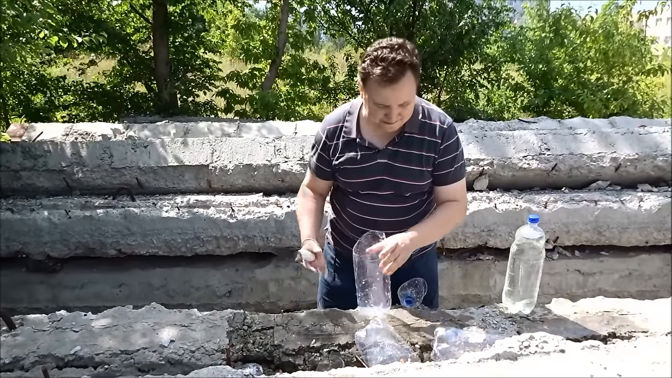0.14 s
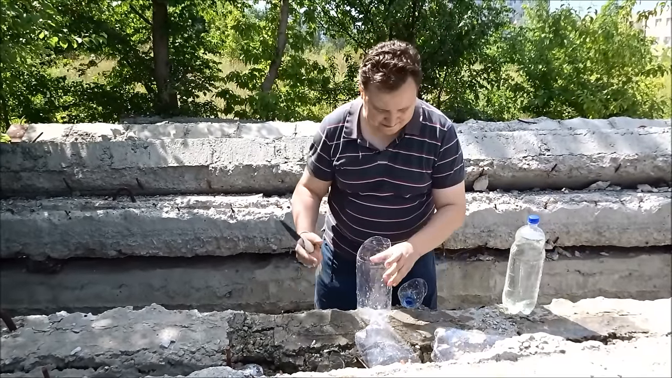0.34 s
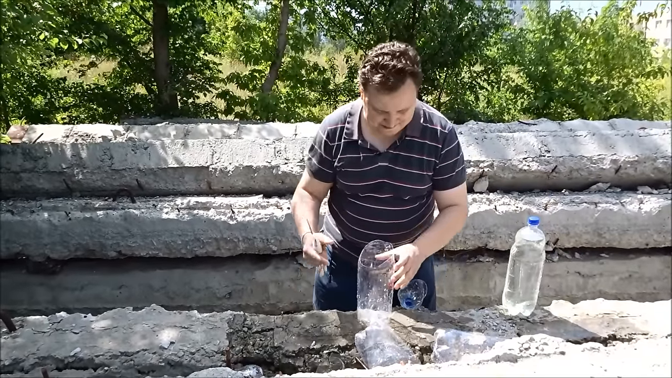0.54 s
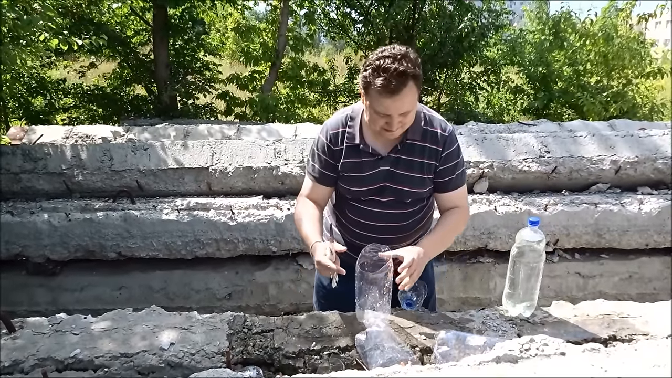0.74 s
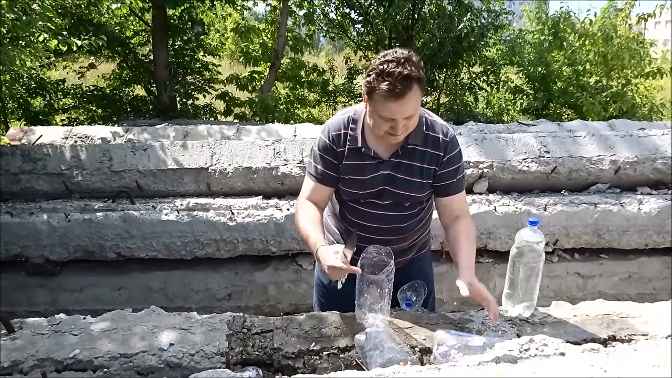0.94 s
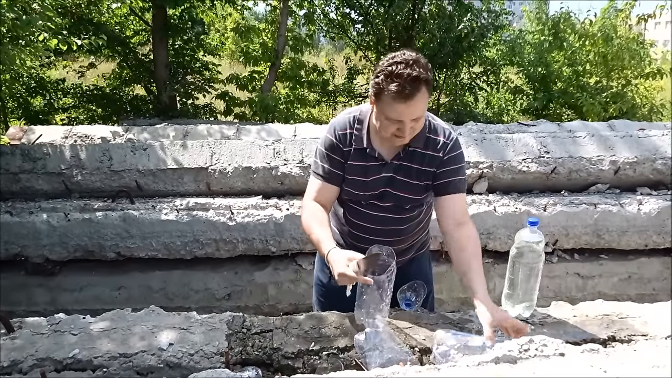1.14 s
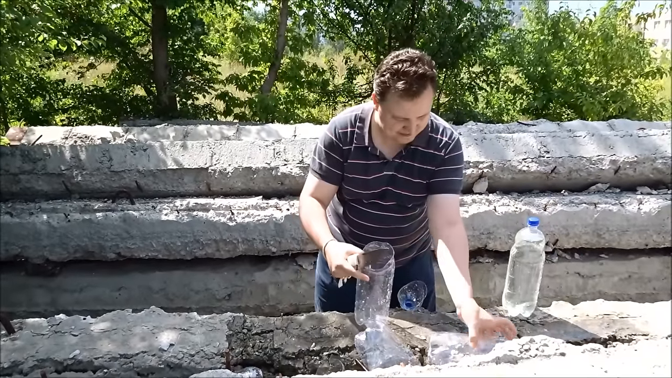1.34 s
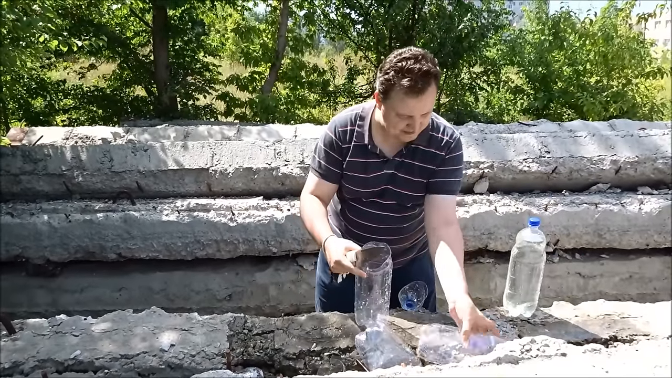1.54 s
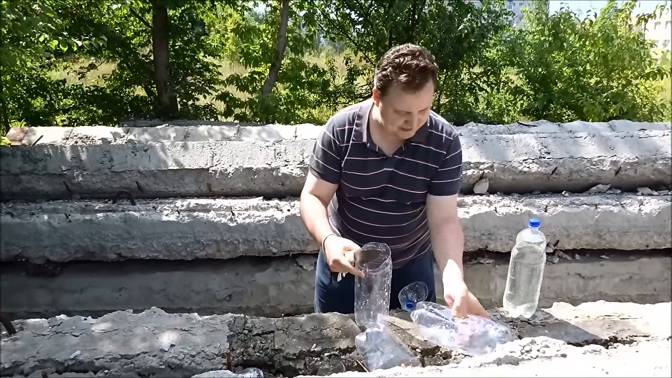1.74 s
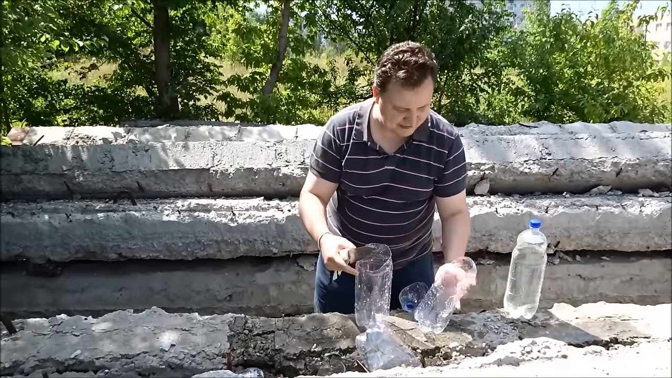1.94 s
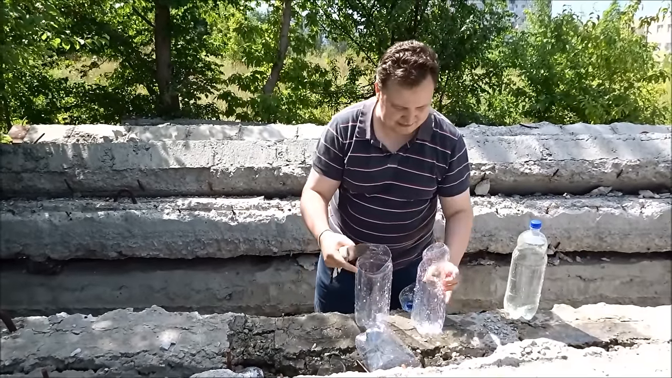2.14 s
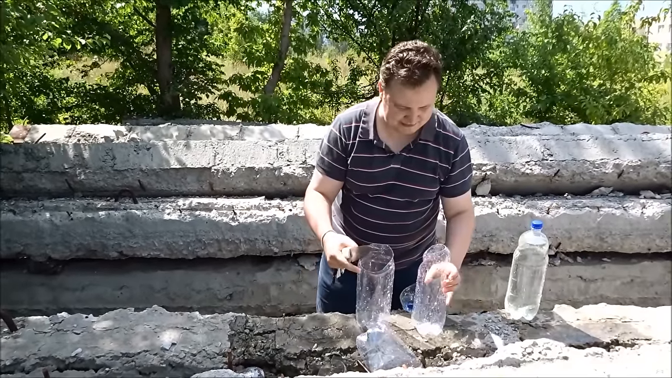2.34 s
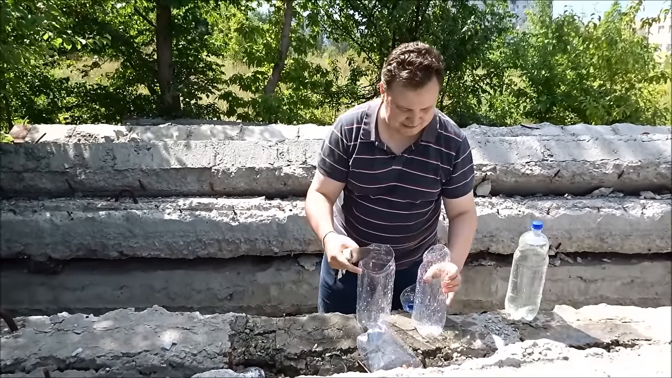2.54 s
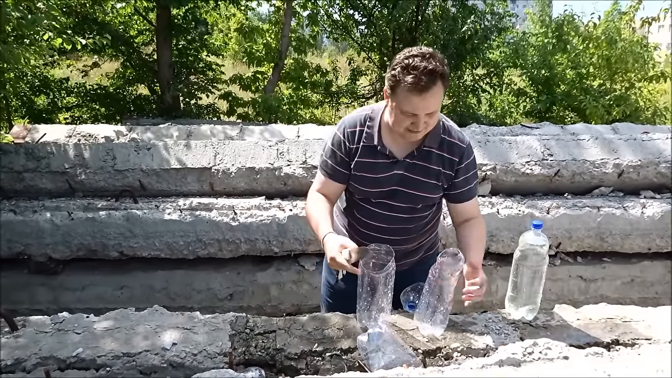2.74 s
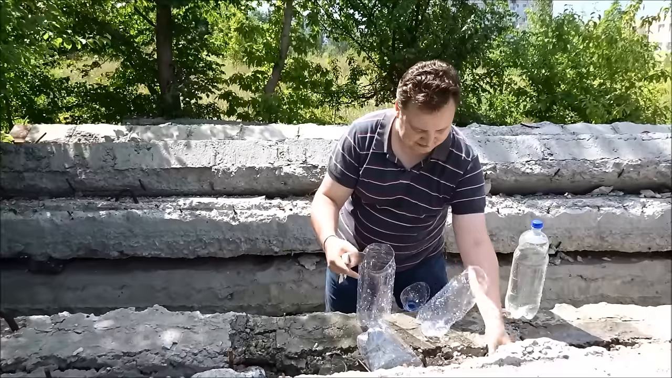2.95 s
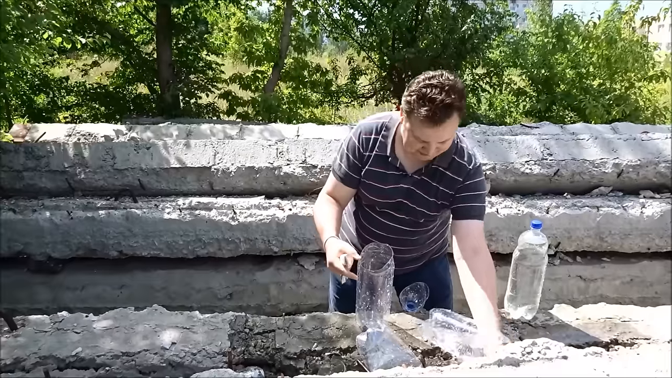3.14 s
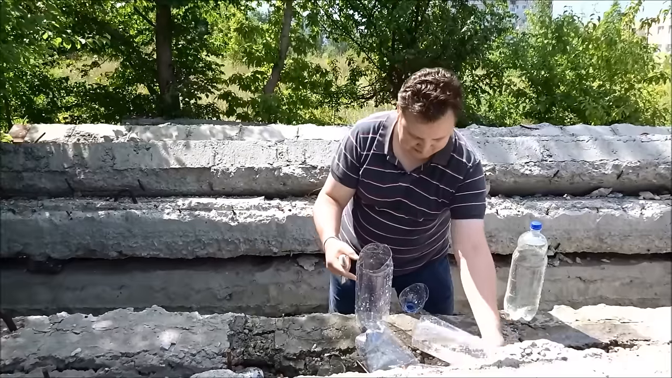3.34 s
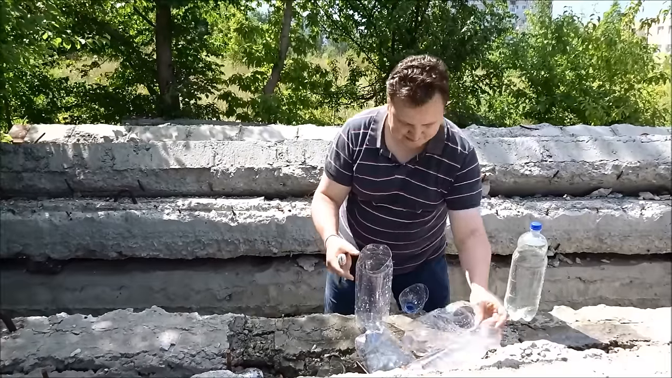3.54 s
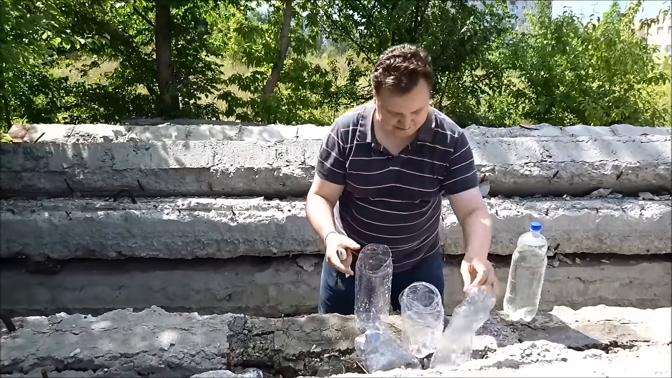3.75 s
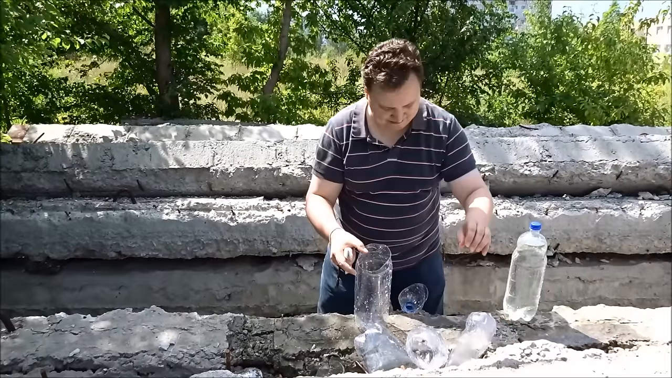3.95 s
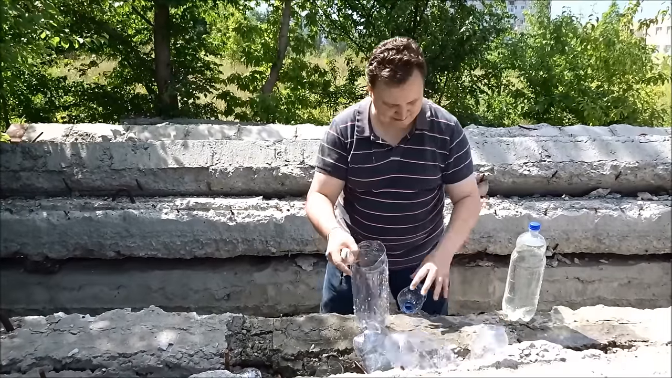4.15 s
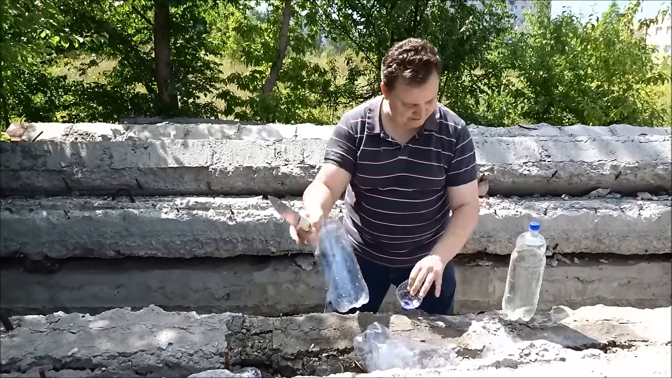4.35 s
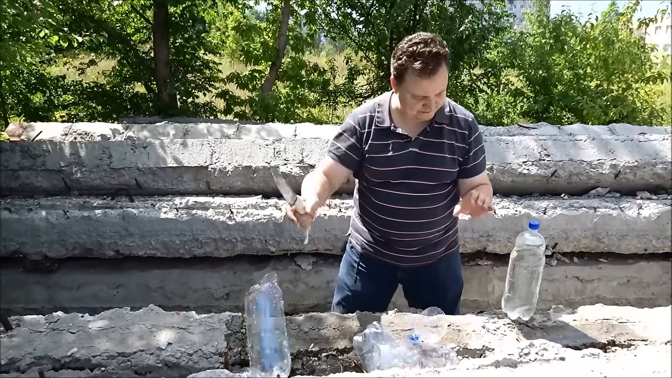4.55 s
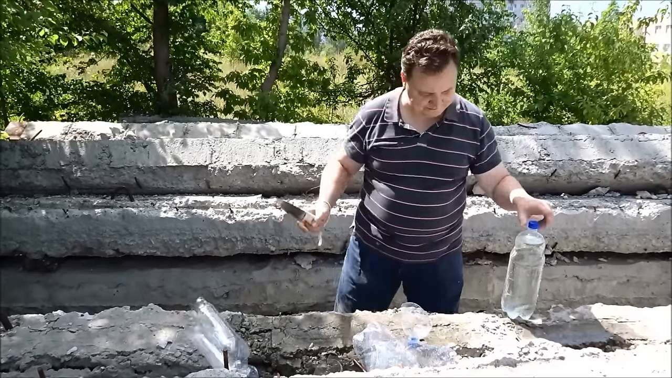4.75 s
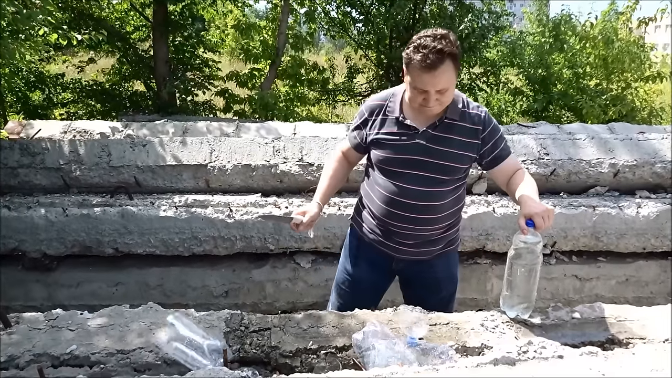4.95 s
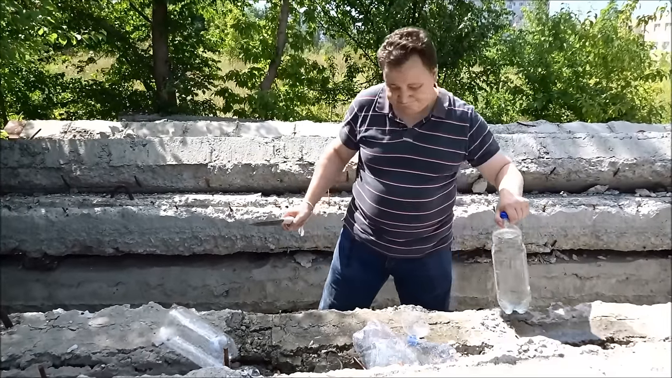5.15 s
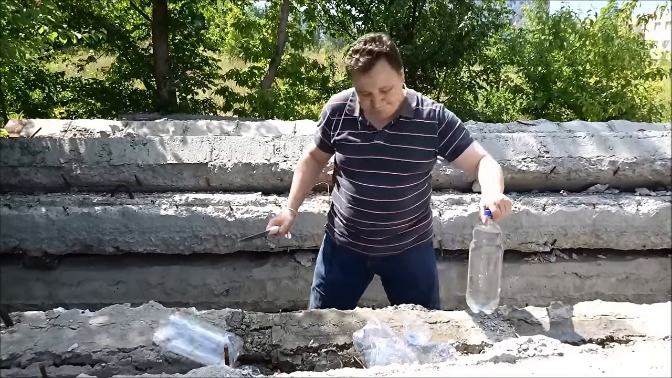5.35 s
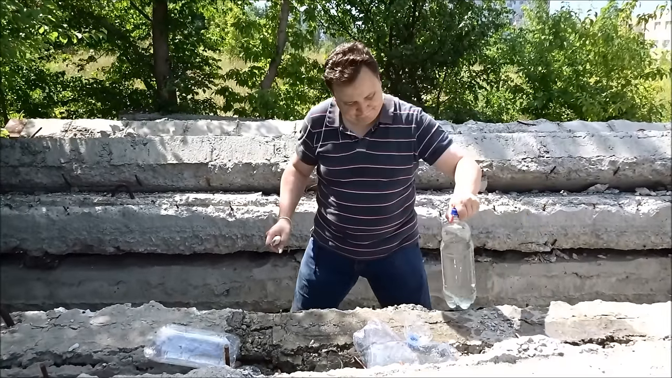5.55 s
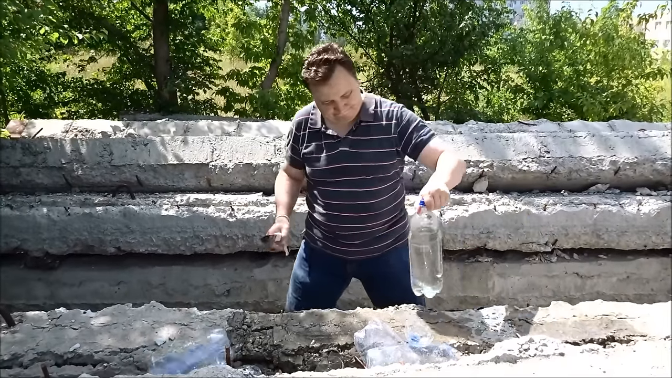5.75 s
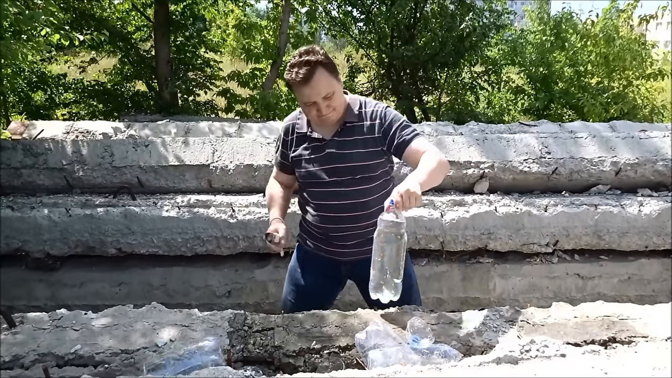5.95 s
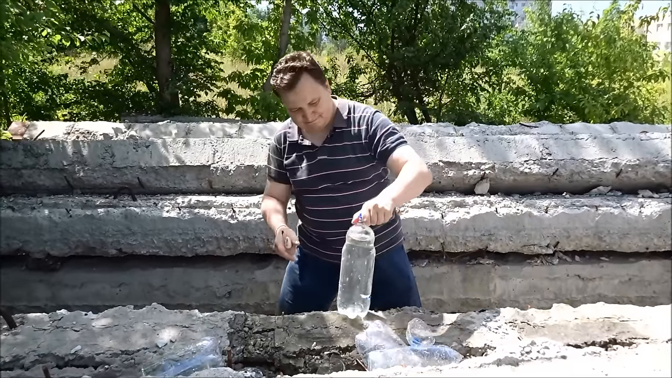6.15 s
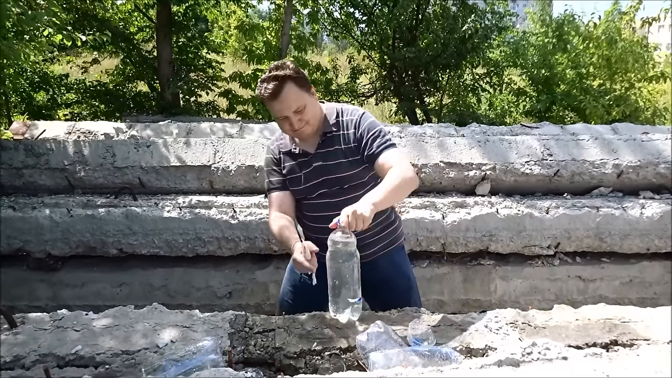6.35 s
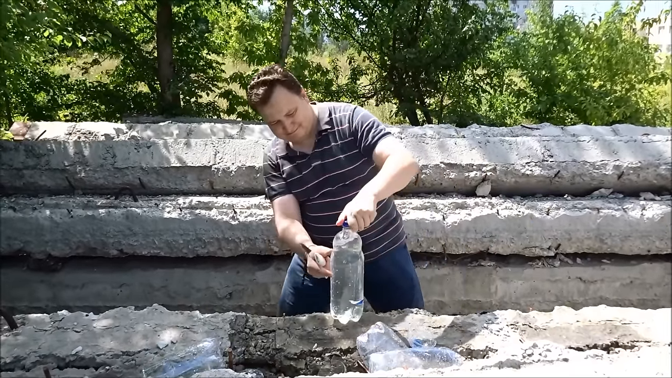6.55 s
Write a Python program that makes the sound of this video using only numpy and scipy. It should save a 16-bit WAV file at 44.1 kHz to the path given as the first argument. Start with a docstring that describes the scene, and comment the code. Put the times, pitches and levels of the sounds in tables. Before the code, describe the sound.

Empty plastic bottles knock hollowly, crackle and roll on a rough concrete slab outdoors, busiest around four seconds, over faint traffic rumble and bright hiss.

```python
"""On a concrete slab outdoors, empty plastic bottles are picked up, knocked over and rolled.
Blows excite damped modes of panel and hollow shell, creases of the thin wall snap as sprays of clicks,
and bumps of the slab keep the shell ringing; a few short clean chirps pop, and the last blows are dull.
Scattered echoes follow. Behind lie a far engine (a wavering sine), the rumble of traffic and the
bright hiss of the camera (both shaped noise)."""
import sys
import numpy as np
from scipy import signal
from scipy.io import wavfile
from scipy.ndimage import uniform_filter1d

SR = 44100
rng = np.random.default_rng(int(sys.argv[2]) if len(sys.argv) > 2 else 0)


def wav_record(signal):
    """Record a signal, one row per channel, as 16-bit PCM in the file named by sys.argv[1]."""
    frames = np.transpose(np.atleast_2d(signal))
    bounded = np.clip(frames, -1, 1)
    # unit amplitude maps onto the largest positive 16-bit level
    quanta = np.round(bounded * 32767).astype(np.int16)
    wavfile.write(sys.argv[1], SR, quanta)


N = 291060

# Modes of the hollow bottle, air mode first: f/Hz (wall modes before retuning), relative level/dB, t60/s
SHELL_MODES = [(171.2, -10.5, 0.29), (257.5, -6.5, 0.24), (326.2, -9, 0.342), (398.5, 1, 0.17),
               (494, -13, 0.28), (569, -3, 0.16), (639, -5, 0.054)]


def amp(db):
    """Level definition: decibels to amplitude ratio."""
    return 10 ** (np.asarray(db) / 20)


def evened(x):
    """Power normalisation: scales x to rms 1."""
    return x / np.sqrt(np.mean(x ** 2) + 1e-20)


def peaked(x):
    """Peak normalisation: scales x to a highest magnitude of 1."""
    return x / abs(x).max()


def read(points, hz):
    """Spectrum interpolation on a logarithmic frequency axis."""
    f, value = np.transpose(points)
    return np.interp(np.log(hz + 1), np.log(f + 1), value)


def curve(rows, count):
    """Linear interpolation in time of column count at every sample; -120 outside the span."""
    columns = np.transpose(rows)
    return np.interp(np.arange(N) / SR, columns[0], columns[count], -120, -120)


def add(mix, s, sound):
    """Superposition: adds a sound to the mix, in place, at time s."""
    part = mix[round(s * SR):][:len(sound)]
    part += sound[:len(part)]


def mode(x, hz, t60):
    """Damped resonance driven by x: one complex pole; a unit click rings at height 1."""
    decay = np.log(1000) / max(t60, .002)
    pole = np.exp((2j * np.pi * hz - decay) / SR)
    return signal.lfilter([1], [1, -pole], x).imag


def band(x, lo_hz, hi_hz):
    """Band limitation: gentle band-pass between two frequencies."""
    edges = [lo_hz, min(hi_hz, SR / 2.2)]
    return signal.sosfilt(signal.butter(2, edges, "bandpass", fs=SR, output="sos"), x)


def grit(shape, per_s, spread_db):
    """Random impulse process: sparse clicks of random sign and uneven size."""
    size_db = spread_db * np.minimum(rng.exponential(1, shape), 4)
    size = amp(size_db) * rng.choice([-1., 1.], shape)
    return size * (rng.random(shape) < per_s / SR)


def shell(x, tune):
    """Modal superposition under the force x: grip and dents retune the wall modes, not the air mode."""
    air, *wall = SHELL_MODES
    air_ring = amp(air[1]) * mode(x, air[0], air[2])
    return air_ring + sum(amp(db) * mode(x, hz * tune, t60) for hz, db, t60 in wall)


def knocks():
    """Impact excitation: a first blow and a decaying chatter of small ones ring panel and shell."""
    # Blows on the shell: t/s, peak level/dB, struck panel f/Hz, contact time/s, relative slap level/dB
    blows = [(0.226, -19.5, 384.4, 0.018, -3), (0.648, -34.5, 170, 0.012, -12),
             (1.049, -19.5, 203, 0.023, -4), (1.066, -17, 267, 0.0025, -8.5),
             (1.127, -25.5, 272, 0.0039, -1), (1.326, -13.5, 258.6, 0.0081, 0.5),
             (1.359, -16.5, 278, 0.0072, -4), (1.375, -18, 1210, .006, -1.5),
             (1.415, -20.5, 234, 0.0017, -11), (1.442, -14, 561, 0.0065, 0),
             (1.488, -20.5, 233, 0.007, -19), (1.511, -18, 210, 0.0079, 8),
             (1.549, -12.5, 304.6, 0.016, 7.5), (1.986, -11, 717, 0.0055, -1),
             (2.041, -12.5, 980, 0.0091, 4), (2.064, -22.5, 644, .006, 1.5), (2.085, -29, 240, 0.023, -10),
             (2.175, -23, 335, 0.03, 4), (2.275, -21.5, 1110, 0.0095, 10), (2.728, -25.5, 320, 0.022, 2.5),
             (3.138, -14.5, 507, 0.02, -2.5), (3.186, -16.5, 593, 0.011, 4), (3.218, -16, 887, 0.018, 6.5),
             (3.245, -15, 314, 0.007, -6), (3.3, -11.5, 723, 0.0055, 9), (3.325, -14, 528, 0.01, 12),
             (3.396, -10.5, 830, 0.0043, -8), (3.42, -13, 848, 0.033, -3.5), (3.432, -12, 251, 0.0043, 2),
             (3.489, -15, 301, 0.0046, 2.5), (3.526, -16.5, 478, .0133, -1.5),
             (3.646, -15, 677, 0.011, 6.5), (3.774, -18, 247, 0.0045, -3), (3.87, -14, 860, 0.026, 4),
             (3.912, -6.5, 324, 0.031, 2.5), (3.939, -2.5, 281.5, 0.015, -1), (3.977, -2.5, 394, .0096, 0),
             (3.986, -9, 920, 0.014, -2), (4.039, -12.5, 340, 0.0066, 16), (4.098, -7.5, 423, 0.0035, 10),
             (4.124, -3, 1096, 0.0039, 11), (4.128, 0.5, 464, 0.0051, 1.5),
             (4.194, -9.5, 333.3, 0.0083, -2.5), (4.224, -10, 491, 0.0035, -5),
             (4.375, -6, 449, 0.0052, -2), (4.384, -12.5, 164, 0.0063, -6), (4.447, -11, 422, 0.012, 1),
             (4.487, -10.5, 946, 0.0079, 1), (4.491, -19.5, 165, 0.012, -3), (4.592, -5, 559, 0.0031, -5),
             (4.682, -12.5, 358, 0.033, -10), (4.739, -12, 381, 0.0092, -2), (4.75, 1, 390, 0.0039, -8.5),
             (4.767, -1, 403, 0.012, -8), (4.989, -9, 379, 0.008, 3.5), (4.999, -5, 396.6, 0.011, -4),
             (5.022, -12.5, 399, 0.013, -12), (5.2, -27, 316, 0.0061, -15),
             (5.292, -27, 286.3, 0.0046, -17), (5.35, -23, 404, 0.017, -4),
             (5.457, -21.5, 342.5, 0.0072, -10), (5.572, -26, 1020, .006, -6),
             (5.639, -25, 300, 0.0091, -28), (5.699, -23.5, 265, 0.015, -23), (5.738, -21, 600, 0.0053, -5),
             (5.771, -24.5, 171, 0.042, -25), (5.841, -25, 276, 0.012, -24), (6.228, -26.5, 670, 0.014, 0),
             (6.263, -33, 695, 0.016, -8)]
    hollow_db, slap_hz = -2.5, 837  # shell ring relative to the panel; centre of the flat-wall slap
    full_from_s = 6.1  # later blows come from the bottle full of water: no hollow ring, less low force
    out, t = np.zeros(N), np.arange(SR // 3) / SR
    modes_hz = np.transpose(SHELL_MODES)[0]
    chatter = grit((len(blows), len(t)), 900, 1.95)
    gravel = grit((len(blows), len(t)), 3500, 3.8)
    for (s, db, hz, contact, slap_db), row, fine in zip(blows, chatter, gravel):
        hollow = s < full_from_s
        force = 1.14 * row * np.exp(-(t / max(contact, .001)) ** 2)
        force[0] = 2.08  # the first blow
        # a dull blow leaves the high modes quiet
        low_hz = min(150, 0.61 * hz) if hollow else 0.81 * hz
        soft = band(band(force, low_hz, 2.5 * hz), 120.0, 2140)
        # the mode nearest to the panel's pitch sets the tuning
        nearest_hz = modes_hz[np.argmin(abs(np.log(modes_hz / hz)))]
        tune = np.clip(hz / nearest_hz, .8, 1.25)
        # a few cycles of the panel over a low thump
        panel = mode(soft, hz, 25 / hz) + 0.51 * mode(soft, 168, 0.015)
        # grains of the slab under the flat wall
        scrape = force + 0.62 * fine * np.exp(-t / (1.34 * contact))
        slap = band(scrape, 0.53 * slap_hz, 1.48 * slap_hz) + 0.013 * mode(scrape, slap_hz * tune, 0.039)
        sound = peaked(panel) + amp(slap_db) * peaked(slap)
        if hollow:
            sound += amp(hollow_db) * peaked(shell(soft, tune))
        add(out, s, amp(db) * peaked(sound))
    return out


def snaps():
    """Buckling: a crease flips, and a spray of clicks builds up and dies in a bright band and wide fizz."""
    # Snaps of the thin wall: t/s (within the build-up), peak level/dB, bright band f/Hz, main spray t60/s
    creases = [(0.2273, -18.5, 5600, 0.039), (1.056, -25, 3080, .047), (1.082, -27.5, 3070, 0.11),
               (1.3215, -14.5, 4300, 0.1), (1.3743, -24, 3200, 0.048), (1.4576, -30, 2920, 0.15),
               (1.505, -23.5, 2750, 0.19), (1.548, -2.5, 4330, 0.032), (1.5697, -12, 6200, .071),
               (1.9871, -16, 1667, 0.0322), (2.0413, -13.5, 3130, 0.032), (2.0622, -20.5, 3980, .037),
               (2.16, -16.5, 5000, 0.076), (2.175, -12, 4260, .0665), (2.206, -17, 8000, .025),
               (2.271, -13, 6100, 0.023), (2.2752, -3.5, 3800, 0.027), (2.299, -19, 4550, 0.046),
               (2.333, -19, 4120, 0.034), (2.3715, -24.5, 3200, 0.064), (3.1289, -19.5, 4220, 0.077),
               (3.174, -23, 3220, 0.076), (3.1876, -17, 3270, 0.047), (3.217, -9, 3300, 0.06),
               (3.272, -23, 3470, .037), (3.301, -5.5, 3570, .025), (3.3277, -9.5, 3785, .0416),
               (3.3926, -18.5, 2940, 0.051), (3.415, -21, 1930, .068), (3.4337, -8.5, 2490, 0.02),
               (3.481, -18.5, 3850, .083), (3.6483, -15.5, 3330, .027), (3.7707, -18, 3620, 0.063),
               (3.817, -24, 2900, 0.085), (3.833, -18, 3200, 0.092), (3.8787, -17, 3320, .13),
               (3.9112, -10, 2580, 0.087), (3.9181, -3.5, 4080, 0.049), (3.9393, -11, 3340, 0.12),
               (3.9758, -6.5, 3750, .0965), (4.0344, -23, 3740, 0.038), (4.0517, -19.5, 3100, 0.07),
               (4.0947, -5, 3600, .035), (4.125, -18, 2050, 0.05), (4.175, -13, 2760, 0.031),
               (4.1892, -15, 3480, 0.055), (4.2246, -12, 3060, 0.028), (4.2837, -15, 6750, 0.077),
               (4.308, -17, 5960, 0.03), (4.373, -15.5, 3100, 0.043), (4.445, -16, 2190, .061),
               (4.482, -18, 3530, 0.057), (4.5164, -26, 3270, .0515), (4.5749, -12.5, 2110, 0.073),
               (4.5793, -1.5, 4600, .075), (4.584, -9.5, 2376, 0.075), (4.6803, -27.5, 3770, 0.23),
               (4.7377, -12, 3790, .098), (4.7468, -11.5, 3270, .049), (4.9864, -10.5, 4130, .09),
               (5.5678, -29, 5630, .045), (6.2217, -28, 4700, 0.1), (6.2558, -27.5, 2160, .0492)]
    # wide fizz: base level, more in bright snaps (from 3.5 kHz), more in long ones
    fizz_base_db, fizz_db_per_octave, fizz_db_per_s = -8.5, 15, 64
    out, t = np.zeros(N), np.arange(SR // 6) / SR
    spray = grit((len(creases), len(t)), 5000, 1.47)
    for (s, db, hz, t60), row in zip(creases, spray):
        rise = 0.08 * t60  # s; a long crunch builds up slowly
        fast = amp(-60 * np.maximum(t - rise, 0) / t60)
        slow = 0.4 * amp(-60 * t / (3 * t60))
        force = row * (fast + slow) * np.minimum(t / rise, 1) ** 2
        force[round(rise * SR)] += 4.5  # the crack itself, at the top of the build-up
        bright = band(band(force, 0.66 * hz, 1.86 * hz), 0.66 * hz, 1.86 * hz)
        bright += 0.028 * mode(force, hz, 0.031)
        fizz = band(force, 2700, 13000) + 0.39 * band(force, 10650, 16400)
        fizz_db = fizz_base_db + fizz_db_per_octave * np.log2(hz / 3500) + fizz_db_per_s * t60
        sound = bright + amp(fizz_db) * fizz
        add(out, s - 0.54 * rise, amp(db) * peaked(sound))
    return out


def pops():
    """Frequency glide: a tone slides up within two cycles, holds, and is cut short with a faint after-ring."""
    # Short clean chirps, perhaps a dent popping back: t/s, approximate peak level/dB, length/s
    chirps = [(4.5495, -3, 0.0057), (4.5774, -10.5, 0.006), (4.64, -8.5, 0.0056)]
    pop_hz = 1334  # held pitch
    out, t = np.zeros(N), np.arange(SR // 20) / SR
    for s, db, length in chirps:
        turns = np.cumsum(pop_hz * (1 - 0.96 * np.exp(-t / 0.0007))) / SR
        held = np.exp(-(t / length) ** 4)
        after_ring = 0.074 * np.exp(-t / 0.0036)
        shape = np.minimum(t / 0.00085, 1) * (held + after_ring)
        add(out, s, amp(db) * shape * np.sin(2 * np.pi * turns))
    return out


def rolling():
    """Roughness excitation: bumps ring the shell, each side tuned a little differently; creases tick finely."""
    # Bottles rolling, rocking and shifting on the rough slab: t/s, rumble level/dB, crinkle level/dB
    motion = [(0.45, -51, -59), (0.7, -67, -60), (1.2, -52, -57), (1.5, -30, -45), (1.75, -55, -73),
              (2.2, -40.5, -43.5), (2.5, -75, -58), (2.75, -42, -73), (2.92, -51, -48), (3.1, -45.5, -50.5),
              (3.36, -29.5, -38), (3.75, -32.5, -45.5), (4.04, -24, -38), (4.3, -30.5, -43),
              (4.6, -33.5, -41.5), (4.98, -35.5, -54.5), (5.15, -40.5, -54), (5.5, -36.5, -50.5),
              (5.9, -38.5, -56.5), (6.03, -49, -54)]
    drone_db = -10.5  # relative to the rumble
    bumps = band(grit((6, N), 200, 1.3), 120.0, 510.0)
    sides = zip(bumps, np.linspace(.85, 1.1, num=6))
    ring = sum(shell(row, tune) + 1.02 * mode(row, 310 * tune, 0.21) for row, tune in sides)
    scuff = band(grit(N, 300, 2.5), 486, 1000)
    rumble = evened(evened(ring) + 0.52 * evened(scuff))
    creases = zip(grit((6, N), 90, 4.1), np.geomspace(2400, 6500, num=6))
    ticks = sum(mode(row, hz, 0.0079) + 8.8 * band(row, hz / 2, hz * 2) for row, hz in creases)
    crackle = band(grit(N, 4000, 0.54), 2100, 6900)
    crinkle = evened(evened(ticks) + 0.89 * evened(crackle))
    # the air inside drones when the bottle rocks
    drone = evened(mode(bumps[0], SHELL_MODES[0][0], 0.094))
    low = amp(curve(motion, count=1)) * (rumble + amp(drone_db) * drone)
    return low + amp(curve(motion, count=2)) * crinkle


def yard(x):
    """Scattering: short echoes off the concrete blocks, different at each microphone port."""
    t = np.arange(SR // 6) / SR
    tail = grit((2, len(t)), 2200, 0) * amp(-60 * t / 0.06) * (t > .002)  # t60 0.06 s after a 2 ms gap
    tail = band(tail, 463.7, 2550) + 0.067 * band(tail, 3300, 4300) + 0.039 * band(tail, 11000, 15400)
    return signal.oaconvolve(x[None], tail / np.linalg.norm(tail[0]), axes=1)[:, :N]


def engine():
    """Periodic firing: the lowest firing order of a far engine, a sine wavering in strength."""
    # Course of the engine: t/s, f/Hz, mean level/dB (rms)
    course = [(0.0, 57.4, -58), (1.2, 57.5, -46.5), (2.6, 57.7, -39.5), (3.5, 57.3, -43), (4.25, 42.7, -44),
              (4.5, 40, -68)]
    waver = uniform_filter1d(rng.standard_normal(N), size=2500)
    waver = evened(uniform_filter1d(waver, size=2500))
    level = np.sqrt(2) * amp(curve(course, count=2) + 1.4 * waver)
    turns = np.cumsum(curve(course, count=1)) / SR
    return level * np.sin(2 * np.pi * turns)


def wash(spectrum, patchy_db):
    """Partly coherent random noise: two channels of a given spectrum with drifting patches, rms 1."""
    # Left-right likeness of the background: f/Hz, coherence (1 = the same)
    likeness = [(60, 1), (140, 0.88), (300, 0.2), (800, 0.083), (2500, 0.17), (5000, 1), (9000, 1),
                (15000, 0.95)]
    frames, hz = N // 256 + 5, np.fft.rfftfreq(1024, 1 / SR)
    a, b, c, d, patches = rng.standard_normal((frames, 513, 5)).T
    patches = uniform_filter1d(patches, size=10, axis=0)  # over frequency
    patches = evened(uniform_filter1d(patches, size=14, axis=1))  # over time
    same = np.clip(read(likeness, hz), -1, 1)[:, None]
    left = a + 1j * b
    right = same * left + np.sqrt(1 - same ** 2) * (c + 1j * d)
    z = np.array([left, right]) * amp(read(spectrum, hz)[:, None] + patchy_db * patches)
    return evened(signal.istft(z, nperseg=1024, noverlap=768)[1][:, :N])


def traffic():
    """Many distant sources sum to random noise: a rumble strongest near 60 Hz."""
    # Traffic spectrum: f/Hz, relative level/dB (per Hz)
    spectrum = [(18, -38.5), (30, -29), (60, 8), (119, -10.5), (167, -10), (282, -11), (395, -13.5),
                (629, -10.5), (1080, -8), (1230, -18.5), (1760, -11.5), (2600, -46), (3380, -72.5),
                (5720, -120)]
    return amp(-39) * wash(spectrum, patchy_db=1.37)


def hiss():
    """Self-noise of the camera: random noise strongest in the high treble."""
    # Hiss spectrum: f/Hz, relative level/dB (per Hz)
    spectrum = [(1290, -46), (2200, -16), (2820, -13), (5220, -16.5), (11500, -7.5), (14600, 2.5),
                (15700, 2.5)]
    return amp(-34.5) * wash(spectrum, patchy_db=1.3)


def scene():
    """Superposition: bottles near the middle, their echoes, and the background."""
    # Course of traffic and hiss together: t/s, relative level/dB
    background_course = [(0.0, -1.5), (1.2, 0), (4.1, 0.9), (4.9, -6), (6.6, -2)]
    bottles = knocks() + snaps() + pops() + rolling()
    direct = bottles * amp([[-.2], [.2]])  # dB, left and right
    echoes = amp(-18.0) * yard(bottles)
    background = amp(curve(background_course, count=1)) * (traffic() + hiss())
    return direct + echoes + background + engine()


def record(dry):
    """Saturation and band limitation: soft overload on the hardest blows, then a steep low-pass."""
    edge_hz = 15760
    held = .96 * np.tanh(dry / .96)
    low_pass = signal.firwin(801, edge_hz, window=("kaiser", 9), fs=SR)
    return signal.oaconvolve(held, low_pass[None], "same")


dry = scene()
out = record(dry)
wav_record(out)
```